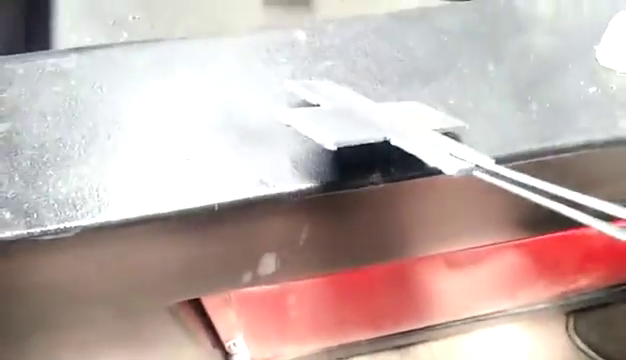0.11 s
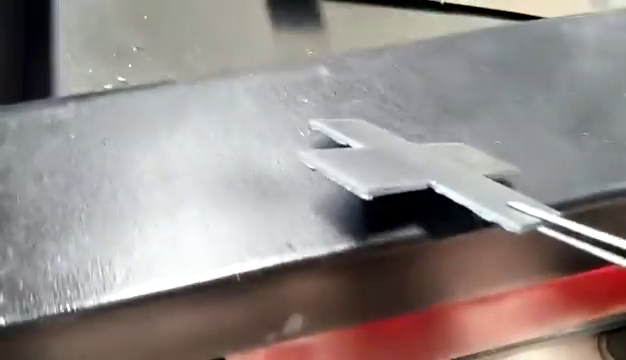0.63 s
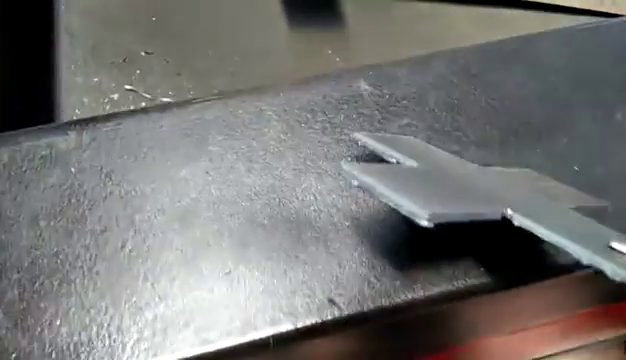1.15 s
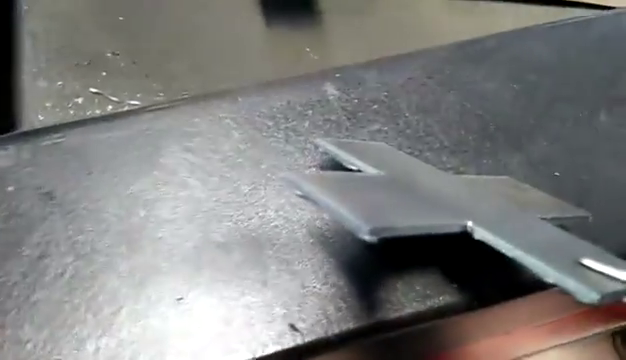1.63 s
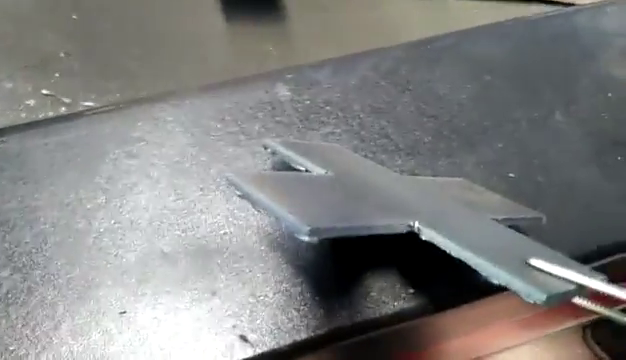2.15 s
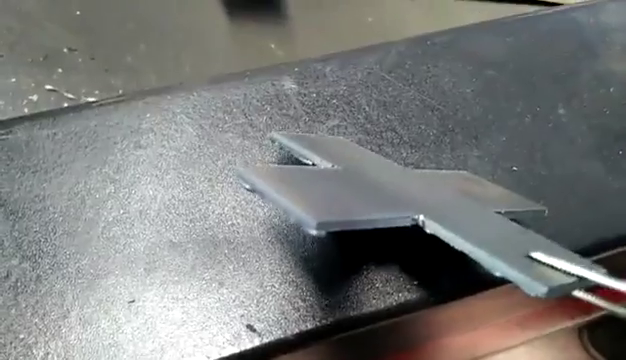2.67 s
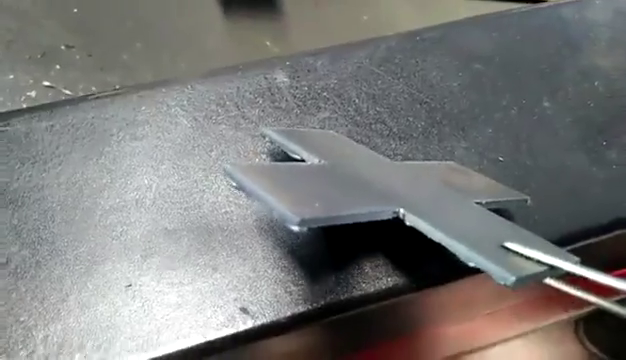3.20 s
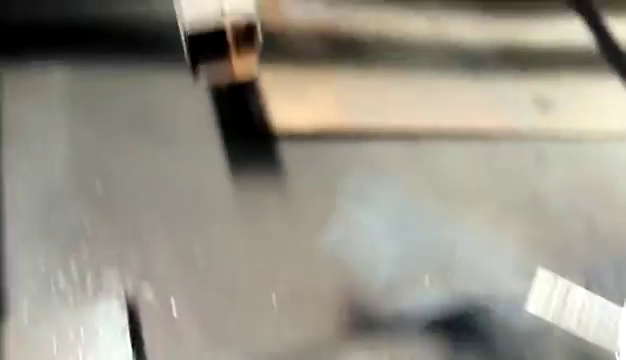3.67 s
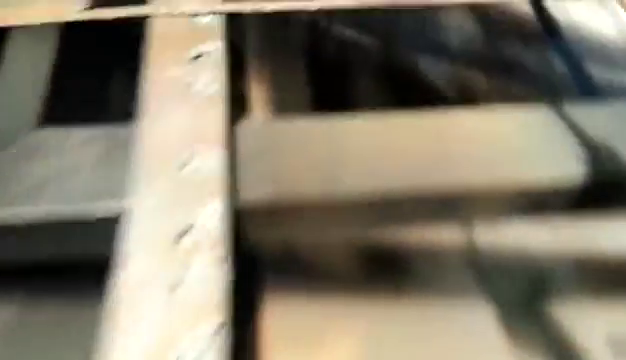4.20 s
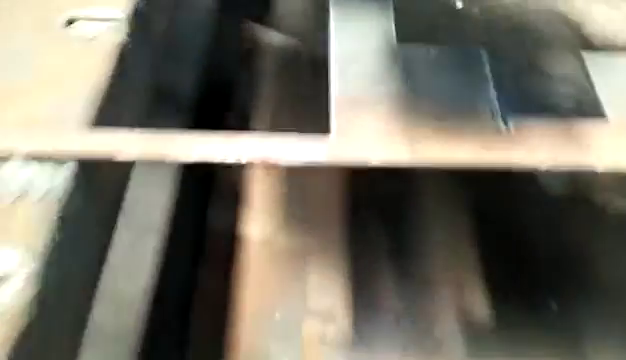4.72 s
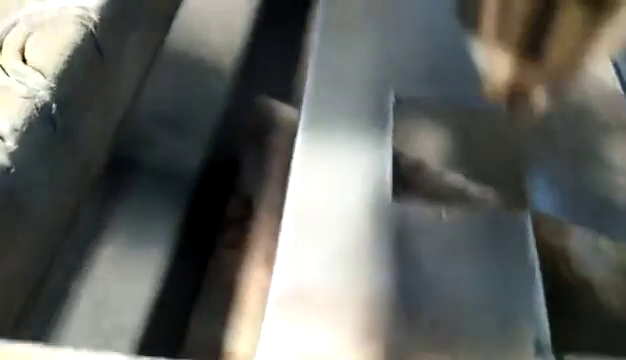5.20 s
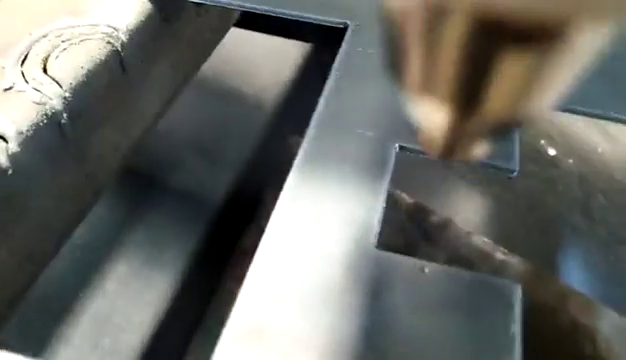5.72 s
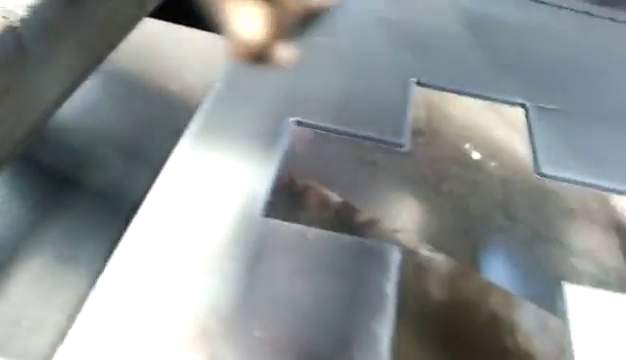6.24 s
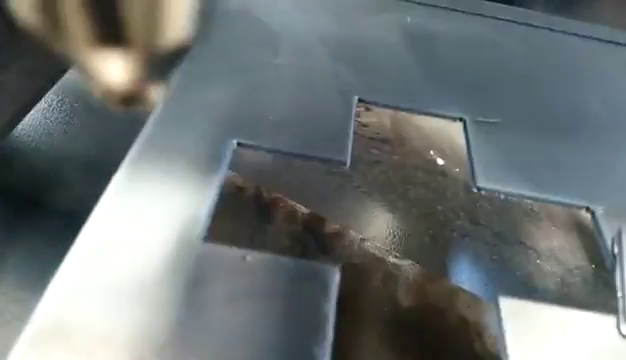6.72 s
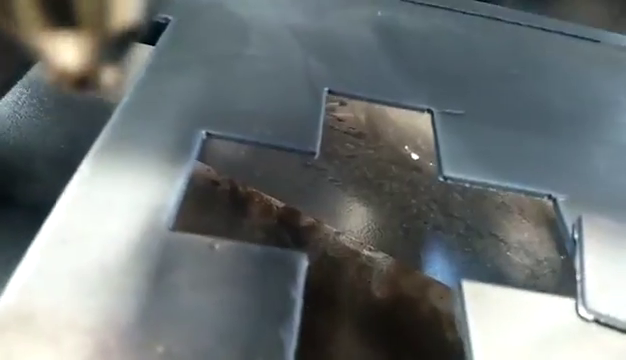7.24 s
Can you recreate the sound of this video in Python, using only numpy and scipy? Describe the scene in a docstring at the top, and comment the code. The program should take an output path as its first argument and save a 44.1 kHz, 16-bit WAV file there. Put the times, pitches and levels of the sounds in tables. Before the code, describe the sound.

A cutting machine in a workshop vents air in loud bursts and blows a long rushing gas jet over faint leak hiss and drone.

```python
"""Workshop with a cutting machine, heard by a hand-held mono microphone that moves about the nozzle.
An exhaust valve, open at the start, vents twice more; each hiss dies away in the hall.
The nozzle blows a long jet: noise whose colour slides with the microphone's place over the steel.
A leak hisses, pipes and edges whistle (resonant noise), power supply and fans hum over a steady drone.
Moving air and hands shake the microphone: lumpy low noise, decaying low sines."""
import sys
import numpy as np
from scipy import signal
from scipy.fft import rfft, irfft, next_fast_len
from scipy.io import wavfile
from scipy.ndimage import uniform_filter1d, map_coordinates

SR = 44100
rng = np.random.default_rng(int(sys.argv[2]) if len(sys.argv) > 2 else 0)


def bounce(signal):
    """Save signal as a 16-bit WAV file at the path given by the first command-line argument."""
    frames = np.transpose(np.atleast_2d(signal))
    limited = np.clip(frames, -1, 1)
    pcm = np.round(limited * 32767).astype(np.int16)
    wavfile.write(sys.argv[1], SR, pcm)


def level_to_linear(level):
    """Convert decibel levels to linear amplitude factors, elementwise."""
    exponent = np.asarray(level, float) / 20
    return 10 ** exponent


N = 325017

# exhaust valve: opens/s, stays open/s, level/dB, rise/s, level of the bleed that follows/dB
VENTS = [(-.3, .31, -11.5, .03, -39.5), (3.67, .34, -12, 0.033, -23.5), (6.737, 0.25, -13.5, 0.047, -50.5)]
# vent colour far from the nozzle: f/Hz, density/dB
VENT_FAR = [(820, -57.5), (1400, -23), (1750, -28), (1910, -9), (2100, -11), (2700, -14), (3200, -2.5),
            (3650, 3.5), (3950, 0.5), (4400, -1), (4750, -14.5), (5250, -17.5), (5800, -25), (6300, -36),
            (7600, -47), (9900, -59), (16700, -120)]
# vent colour near the nozzle: f/Hz, density/dB
VENT_NEAR = [(820, -47), (1500, -35), (1870, -20), (2300, -15), (2900, -10.5), (3400, -11.5), (3680, -4),
             (4150, 2), (4500, -2.5), (5000, 2.5), (5600, -7.5), (6200, -21), (7600, -43), (9900, -59),
             (16700, -120)]
VENT_SAG_DB_PER_S, BLEED_DB_PER_S = 8, 6  # loss while open; loss of the bleed
VENT_TILT_DB_PER_OCT, VENT_DULLING_PER_OCT = -1.5, 0.35  # at full flow; dB lost per dB of flow lost
SEEP_DB, SEEP_S = -20.5, 0.2  # seep before opening: under the vent level; swell time constant
CHATTER_DB, CHATTER_S = 1.5, 0.13  # stutter at shutting: depth, time constant
HALL_DECAY_DB_PER_S = 48.5  # stopped hiss dying in the hall

# jet flow: t/s, level/dB
JET_FLOW = [(4.45, -20.5), (4.62, -19.5), (5.0, -16.5), (5.3, -16.5), (5.75, -15), (6.0, -17),
            (6.24, -17.5), (6.4, -19.5), (6.75, -20), (7.04, -24.5)]
# jet spurts, the last row the small tick of the valve closing: t/s, length/s, level over the flow/dB
SPURTS = [(4.453, .05, 5), (4.498, 0.078, 2.5), (4.987, 0.12, 1.5), (5.709, 0.023, 0), (7.124, .012, 6)]
# jet colour far from the nozzle: f/Hz, density/dB
JET_FAR = [(180, -42), (300, -12), (482, -11), (522, -15.5), (805, -19), (1040, -10), (1360, -8),
           (1970, -7.5), (2510, -9.5), (2790, -5), (3030, -4), (4370, -2), (5350, -8), (6370, -14),
           (7600, -20), (9880, -35), (16700, -120)]
# jet colour near the nozzle, notched by the plate's reflection: f/Hz, density/dB
JET_NEAR = [(180, -30.5), (300, -3), (409, -13), (685, -27), (784, -16.5), (1010, 3.5), (1480, -12.5),
            (1790, 4.5), (2020, -7), (2510, -12), (2720, -28), (3110, -5.5), (3380, -12), (4480, 0),
            (7600, -10.5), (9880, -48), (16700, -120)]
JET_OPENS_S, JET_RISE_S, JET_SHUTS_S = 4.443, 0.016, 7.04
JET_TILT_DB_PER_OCT, JET_BRIGHTENING_PER_OCT = 1.5, 0.16  # at -15.5 dB; dB gained per dB of flow
SPURT_BRIGHTENING_PER_OCT = 1  # dB gained per dB of spurt or tick

# steady leak: t/s, level/dB, brightness/(dB per octave)
LEAK = [(0, -38, 1), (.5, -39, 0.5), (1.26, -36, 2), (2.1, -35, 1), (3.2, -35, 0.5), (3.5, -34.5, -0.5),
        (3.66, -36, 0), (4.2, -36, 3.5), (4.44, -28.5, 5), (4.8, -41, 0)]
# leak colour, microphone turned away: f/Hz, density/dB
LEAK_AWAY = [(260, -44.5), (450, -15), (495, -5), (740, -20.5), (803, -9.5), (1110, -3), (1190, -4.5),
             (1610, -13.5), (2410, -20.5), (2650, -2.5), (2920, -6.5), (3210, -13), (3870, -20.5),
             (4360, -5), (7600, -5.5), (9880, -43), (16700, -120)]
# leak colour, microphone facing the machine: f/Hz, density/dB
LEAK_FACING = [(260, -34.5), (450, -9.5), (634, -5), (740, -11), (894, -3), (1190, -12), (1600, -6),
               (1970, -17), (2200, -2.5), (2680, -13), (2950, -7), (4260, -1.5), (4850, -6.5),
               (6070, -11.5), (7600, -20), (9880, -52.5), (16700, -120)]
# under the vent flow: steady share; spit at the opening and its time constant
LEAK_DRAWN_DB, SPIT_DB, SPIT_S = -20, -23, 0.034

# hand carrying the microphone: t/s, turn towards the machine/0-1, nearness to the nozzle/0-1
WALK = [(0, 0.4, 0.28), (.9, 0.41, 0.4), (2, 0.7, 0.5), (3.2, 0.84, 0.45), (4.9, 0.2, 0.22), (5.4, 1, 0.15),
        (5.7, 1, 0.27), (6.3, 0.8, 0.54), (7.37, 0.95, 0.77)]

# breathy whistles of air in pipes and edges: start/s, length/s, f/Hz, width/Hz, level before fades/dB
WHISTLES = [(0, 0.26, 967, 70, -42), (0, 0.18, 1980, 150, -38), (0.208, 0.11, 1934, 60, -35.5),
            (.38, .12, 1914, 60, -46.5), (0, .15, 490, 49.7, -44), (0.908, 0.22, 5360, 250, -43.5),
            (3.698, 0.064, 1205, 35, -33.5), (3.692, 0.47, 1950, 120.5, -32.5),
            (3.854, .3, 1233, 50, -41.5), (3.812, 0.088, 712, 25, -33), (4.26, 0.4, 485, 83, -43.5),
            (4.496, 0.045, 6600, 149.6, -25), (4.502, 0.045, 4500, 304, -25),
            (4.976, 0.079, 6590, 120.3, -25), (5.004, 0.24, 4350, 350, -25),
            (5.201, 0.76, 1745, 100, -32.5), (5.603, 0.77, 1093, 140, -42), (6.05, 0.85, 1788, 99.6, -34),
            (6.737, 0.45, 960, 89.8, -35)]
WHISTLE_STEADINESS, WHISTLE_FLUTTER_DB = 0.45, 1.5

# moving air on the microphone: t/s, level/dB
BUFFET = [(0, -48), (.1, -49.5), (.4, -65.5), (3.66, -63), (3.75, -50), (4.1, -47), (4.44, -54.5),
          (4.65, -43.5), (5.1, -40.5), (5.45, -35.5), (5.8, -34), (6.45, -36), (6.7, -41), (7.04, -38),
          (7.37, -53.5)]
# colour of the buffeting: f/Hz, density/dB
BASS = [(12, -41.5), (20, -21.5), (82, -2), (135, 0.5), (260, -5), (340, -11.5), (570, -120)]
# colour of the low roar: f/Hz, density/dB
ROAR = [(110, -38.5), (180, -15.5), (363, 5), (441, -2), (488, 5), (692, 3), (750, 0.5), (900, 0),
        (1170, -16.5), (1980, -120)]
VENT_ROAR_DB = -24.5  # under the vent flow
JET_ROAR_DB, ROAR_DB_PER_BUFFET_DB = -37, 0.32  # level at a buffet of -39 dB; slope

# hands on the microphone: t/s, level before decay/dB, f/Hz
THUMPS = [(1.537, -45, 94), (2.268, -38, 71.4)]

# power supply and fans: f/Hz, width/Hz, level/dB, steadiness/0-1
HUM = [(199, 2.5, -62.5, 1), (242.5, 8, -65, 0.5), (485, 13, -61.5, .3), (888, 14, -57.5, .3),
       (1117, 25, -55.5, 0.2)]
# colour of the workshop drone: f/Hz, density/dB
HALL = [(12, -58), (20, -16.5), (27, -19), (65, -2), (171, -9.5), (185, -3), (203, -3), (251, -13.5),
        (272, -9), (488, -4.5), (527, -11), (635, 4.5), (800, -5), (1040, -35.5), (1760, -120)]
# drone: t/s, mean level/dB
HALL_DB = [(0, -50.5), (1.2, -54.5), (2.2, -55), (3.2, -51), (7.37, -47)]

# treble patches where left and right get unlike noise: f/Hz, threshold under which a patch sounds/0-1
SPREAD = [(3700, 0), (4500, .1), (5500, .22), (6500, .33), (7300, .5)]
TOP_HZ, FRAME = 7545, 1024  # band limit; STFT frame/samples


def vent():
    """Exhaust hiss: the weaker the flow, the duller; the valve stutters as it shuts."""
    t, flow = np.arange(N) / SR, vent_flow()
    lost_db = np.clip(to_db(flow.max() / (flow + 1e-5)), 0, 30)
    tilt_db = VENT_TILT_DB_PER_OCT - VENT_DULLING_PER_OCT * lost_db
    shutting = 0
    for opens_s, open_s, *_ in VENTS:
        since_s = t - opens_s - open_s
        shutting = shutting + (since_s > 0) * np.exp(-np.abs(since_s) / CHATTER_S)
    gain = flow * level_to_linear(CHATTER_DB * shutting * wobble(55))
    return moving_hiss(gain, tilt_db, VENT_FAR, VENT_NEAR, axis=1,
                       patchy_db=1.1, streaky_db=2.6, flutter_db=0.4)


def vent_flow():
    """Gain of the ventings: seep, rise, sag while open, the hall's decay, then a weak bleed."""
    t, power = np.arange(N) / SR, 0
    for opens_s, open_s, db, rise_s, bleed_db in VENTS:
        shuts_s = opens_s + open_s
        sag_db = VENT_SAG_DB_PER_S * np.clip(t - opens_s - rise_s, 0, open_s)
        blast = level_to_linear(db - sag_db) * valve(opens_s, rise_s, shuts_s)
        bleed = level_to_linear(bleed_db - BLEED_DB_PER_S * np.clip(t - shuts_s, 0, None)) * (t > opens_s + rise_s)
        seep = level_to_linear(db + SEEP_DB) * np.exp(np.clip(t - opens_s, None, 0) / SEEP_S)
        seep = seep * (t < opens_s + rise_s)
        power = power + seep ** 2 + blast ** 2 + bleed ** 2
    return np.sqrt(power)


def jet():
    """Gas through the cutting nozzle onto the plate; more flow is brighter."""
    t, (flow_db,) = np.arange(N) / SR, curves(JET_FLOW)
    spurt_db = 0
    for s, length_s, db in SPURTS:
        rise = np.clip((t - s) / 0.0089, 0, 1)
        fall = np.clip(1.5 - (t - s) / length_s, 0, 1)
        spurt_db = spurt_db + db * rise * fall
    tilt_db = JET_TILT_DB_PER_OCT + JET_BRIGHTENING_PER_OCT * (flow_db + 15.5)
    tilt_db = tilt_db + SPURT_BRIGHTENING_PER_OCT * spurt_db
    gain = level_to_linear(flow_db + spurt_db) * valve(JET_OPENS_S, JET_RISE_S, JET_SHUTS_S)
    return moving_hiss(gain, tilt_db, JET_FAR, JET_NEAR, axis=1,
                       patchy_db=1.2, streaky_db=2, flutter_db=0.7)


def leak():
    """Faint hiss on the air line; swells with each venting, spits as the valve opens."""
    t, (level_db, tilt_db) = np.arange(N) / SR, curves(LEAK)
    spit = sum(np.exp(-np.abs(t - s - rise_s) / SPIT_S) for s, _, _, rise_s, _ in VENTS)
    drawn = vent_flow() * (level_to_linear(LEAK_DRAWN_DB) + level_to_linear(SPIT_DB) * spit)
    gain = np.hypot(level_to_linear(level_db), drawn)
    return moving_hiss(gain, tilt_db, LEAK_AWAY, LEAK_FACING, axis=0,
                       patchy_db=1.5, streaky_db=4.5, flutter_db=1.0)


def whistles():
    """Air in pipes and edges: resonant noise, risen within 11 ms, fading around its length."""
    out, t = np.zeros(N + 2 * SR), np.arange(3 * SR // 2) / SR
    for s, length_s, hz, width_hz, db in WHISTLES:
        rise = np.clip((t + 0.002) / 0.013, 0, 1)
        fade = np.clip((1.25 - t / length_s) / 0.5, 0, 1)
        tone = narrow(hz, width_hz, WHISTLE_STEADINESS, count=len(t))
        out[max(round(s * SR), 0):][:len(t)] += level_to_linear(db) * rise * fade * tone
    return out[:N] * level_to_linear(WHISTLE_FLUTTER_DB * wobble(18))


def rumble():
    """Moving air pushes in lumps on the microphone; the venting and the jet roar low."""
    bass = unit(level_to_linear(0.98 * wobble(9) + 0.95 * wobble(5)) * coloured(BASS))
    roar = turbulence(lambda hz, t: along(ROAR, hz), patchy_db=3.0, streaky_db=4.0)
    roar = unit(level_to_linear(2.1 * wobble(8)) * roar)
    (buffet_db,) = curves(BUFFET)
    jet_roar = level_to_linear(JET_ROAR_DB + ROAR_DB_PER_BUFFET_DB * (buffet_db + 39))
    jet_roar = jet_roar * valve(JET_OPENS_S, JET_RISE_S, JET_SHUTS_S)
    roar_gain = np.hypot(level_to_linear(VENT_ROAR_DB) * vent_flow(), jet_roar)
    return level_to_linear(buffet_db) * bass + roar_gain * roar


def thumps():
    """Hands on the microphone: a soft low sine push, its decay 60 dB in 0.22 s."""
    out, t = np.zeros(N + SR), np.arange(SR // 2) / SR
    for s, db, hz in THUMPS:
        envelope = level_to_linear(db - 60 * t / 0.22) * (1 - np.exp(-t / 0.012))
        out[round(s * SR):][:len(t)] += envelope * np.sin(2 * np.pi * hz * t)
    return out[:N]


def hum():
    """Workshop drone plus slightly unsteady tones of power supply and fans."""
    drone = level_to_linear(curves(HALL_DB)[0] + 2.3 * wobble(6)) * coloured(HALL)
    tones = sum(level_to_linear(db) * narrow(hz, width_hz, steady, count=N) for hz, width_hz, db, steady in HUM)
    return drone + tones


def moving_hiss(gain, tilt_db, first, second, axis, patchy_db, streaky_db, flutter_db):
    """Hiss whose colour slides between two places of the microphone and tilts around 4 kHz."""
    def colour_db(hz, t):
        """Blend by place (WALK column axis), plus tilt."""
        place = np.clip(curves(WALK, t)[axis], 0, 1)
        tilt = np.interp(t, np.arange(N) / SR, tilt_db) * np.log2((hz + 500) / 4500)
        return (1 - place) * along(first, hz) + place * along(second, hz) + tilt
    return gain * level_to_linear(flutter_db * wobble(40)) * turbulence(colour_db, patchy_db, streaky_db)


def turbulence(colour_db, patchy_db, streaky_db):
    """Noise of rms 1, colour (Hz, s) -> dB may drift; short patches and long thin streaks of gain."""
    hz, t, z = signal.stft(rng.standard_normal(N), SR, nperseg=FRAME, noverlap=FRAME * 3 // 4)
    gain = level_to_linear(colour_db(hz[:, None], t)) * np.ones(z.shape)
    gain = gain / np.sqrt(np.mean(gain ** 2, axis=0))  # level independent of colour
    patches = uniform_filter1d(rng.standard_normal(z.shape), size=6, axis=0)
    patches = uniform_filter1d(patches, size=12, axis=1)
    streaks = uniform_filter1d(rng.standard_normal(z.shape), size=70, axis=1)  # standing waves of the hall
    texture = level_to_linear(patchy_db * unit(patches) + streaky_db * unit(streaks))
    return unit(signal.istft(z * gain * texture, SR, nperseg=FRAME, noverlap=FRAME * 3 // 4)[1][:N])


def valve(opens_s, rise_s, shuts_s):
    """Gain of a flow that opens, holds, and dies away in the hall once shut."""
    t = np.arange(N) / SR
    decay_db = HALL_DECAY_DB_PER_S * np.clip(t - shuts_s, 0, None)
    return np.clip((t - opens_s) / rise_s, 0, 1) * level_to_linear(-decay_db)


def narrow(hz, width_hz, steady, count):
    """Noise of rms 1 through one sharp resonance; self-sustained flow evens out its level."""
    size = next_fast_len(count)
    f = np.fft.fftfreq(size, 1 / SR)
    resonance = 1 / (1 + (2 * (f - hz) / width_hz) ** 2)
    tone = np.fft.ifft(np.fft.fft(rng.standard_normal(size)) * resonance)[:count]  # complex
    return unit(np.real(tone / np.abs(tone) ** np.clip(steady, 0, 1)))


def coloured(spectrum):
    """Steady noise of rms 1 with a finely resolved spectrum."""
    size = next_fast_len(N)
    gain = level_to_linear(along(spectrum, np.fft.rfftfreq(size, 1 / SR)))
    return unit(irfft(rfft(rng.standard_normal(size)) * gain, size)[:N])


def wobble(knots_per_s):
    """Smooth random curve through normal knots."""
    knots = rng.standard_normal(int(N * knots_per_s / SR) + 4)
    return map_coordinates(knots, [np.arange(N) * knots_per_s / SR])


def curves(rows, t=None):
    """Each column after the time, read at the times t."""
    s, *cols = np.transpose(rows)
    return [np.interp(np.arange(N) / SR if t is None else t, s, c) for c in cols]


def along(points, hz):
    """(f/Hz, value) points read on a log frequency axis."""
    f, v = np.transpose(points)
    return np.interp(np.log(hz + 1), np.log(f + 1), v)


def unit(x):
    """Scale to rms 1."""
    return x / np.sqrt(np.mean(x ** 2) + 1e-20)


def to_db(gain):
    """Gain to dB."""
    return 20 * np.log10(gain + 1e-5)


def unlike_treble(mono):
    """In treble patches left and right get unlike noise: it is added left, subtracted right."""
    hz, t, z = signal.stft(mono, SR, nperseg=FRAME, noverlap=FRAME * 3 // 4)
    # blocks of 12 bins (0.5 kHz) by 6 hops (35 ms), smoothed over 3 blocks of frequency
    blocks = rng.standard_normal((z.shape[0] // 12 + 1, z.shape[1] // 6 + 1))
    blocks = unit(uniform_filter1d(blocks, size=3, axis=0))
    chance = np.repeat(np.repeat(1 / (1 + np.exp(1.7 * blocks)), 12, axis=0), 6, axis=1)
    chance = chance[:z.shape[0], :z.shape[1]]
    power = uniform_filter1d(np.abs(z) ** 2, size=10, axis=0)
    level = np.sqrt(np.abs(uniform_filter1d(power, size=6, axis=1)))
    noise = signal.stft(rng.standard_normal(N), SR, nperseg=FRAME, noverlap=FRAME * 3 // 4)[2]
    noise = noise / np.sqrt(np.mean(np.abs(noise) ** 2))
    patches = (chance < along(SPREAD, hz)[:, None]) * level * noise
    side = level_to_linear(-5.5) * signal.istft(patches, SR, nperseg=FRAME, noverlap=FRAME * 3 // 4)[1][:N]
    return np.array([mono + side, mono - side])


def scene():
    """One microphone hears everything."""
    mono = vent() + jet() + leak() + whistles() + rumble() + thumps() + hum()
    return np.array([mono, mono])


def band_limit(x):
    """A steep low-pass at the top of the band."""
    return signal.sosfilt(signal.butter(12, 8590, fs=SR, output="sos"), x)


def record(dry):
    """Loud peaks rounded off, treble patches made unlike left and right, band limited at TOP_HZ."""
    rounded = dry[0] / (1 + np.abs(dry[0] / 0.85) ** 4) ** (1 / 4)
    size = next_fast_len(N + SR // 4)
    passed = np.fft.rfftfreq(size, 1 / SR) < TOP_HZ
    mix = irfft(rfft(unlike_treble(rounded), size) * passed, size)[:, :N]
    return band_limit(mix)


dry = scene()
out = record(dry)
bounce(out)
```